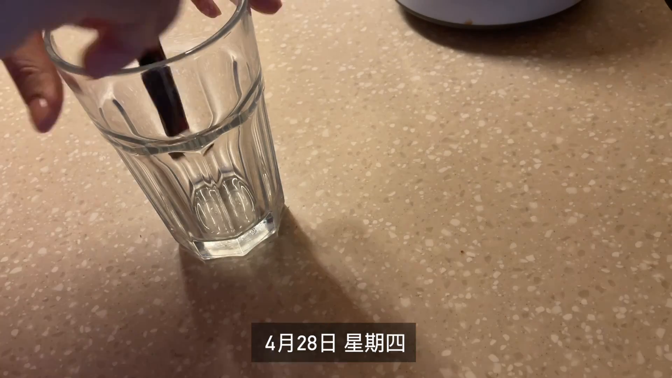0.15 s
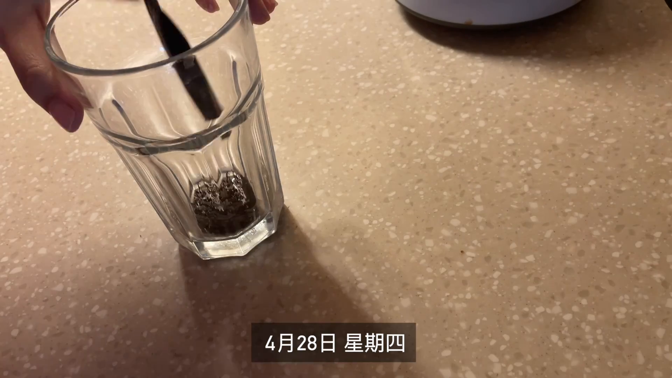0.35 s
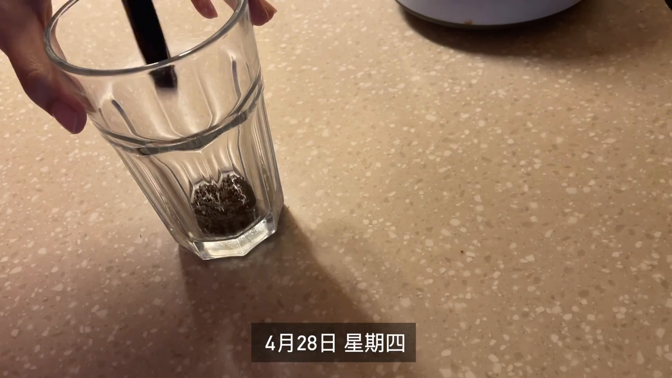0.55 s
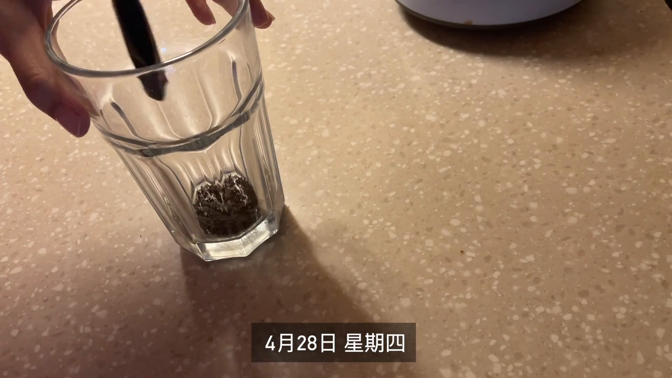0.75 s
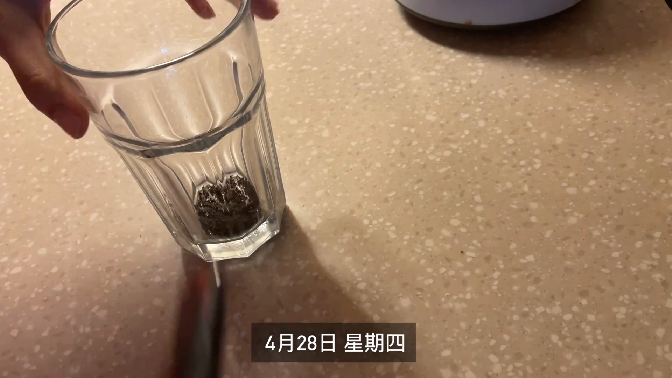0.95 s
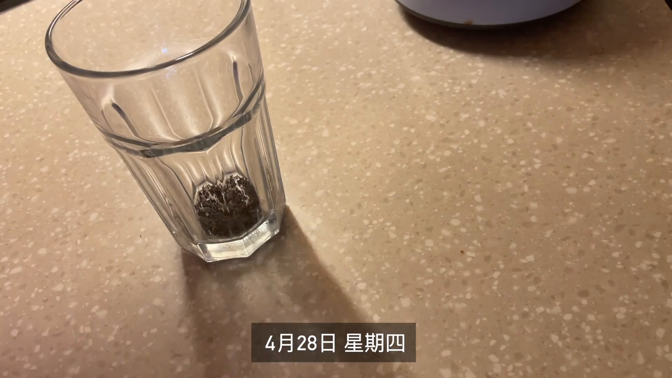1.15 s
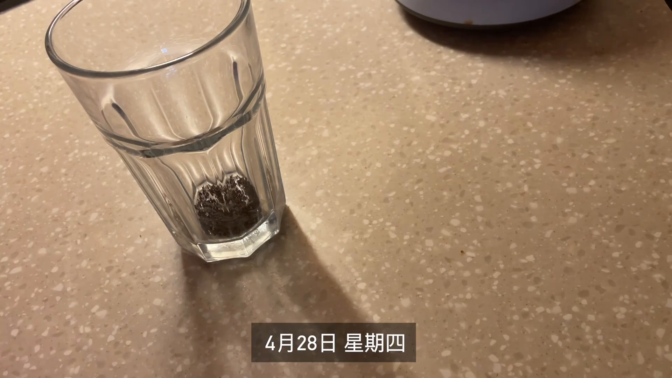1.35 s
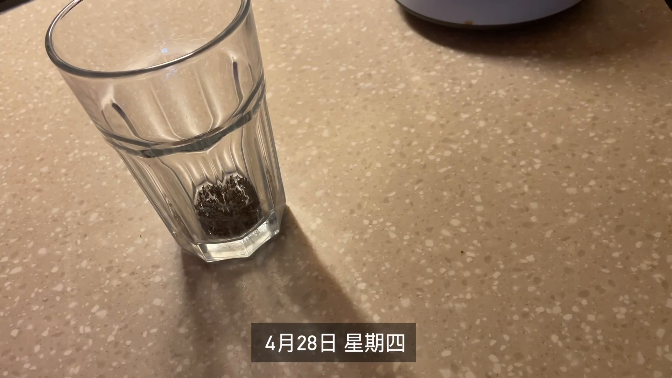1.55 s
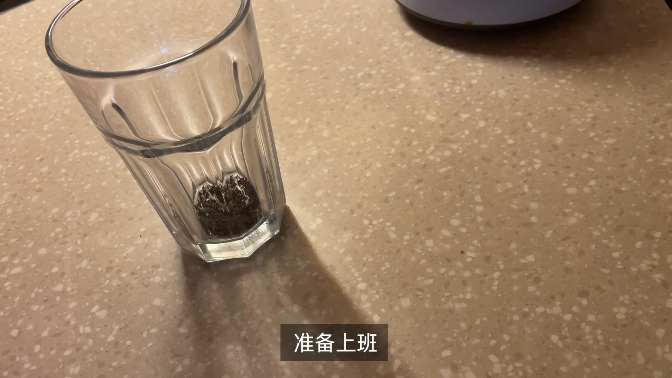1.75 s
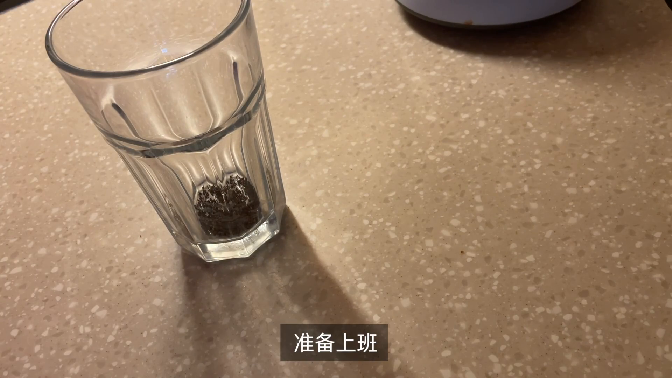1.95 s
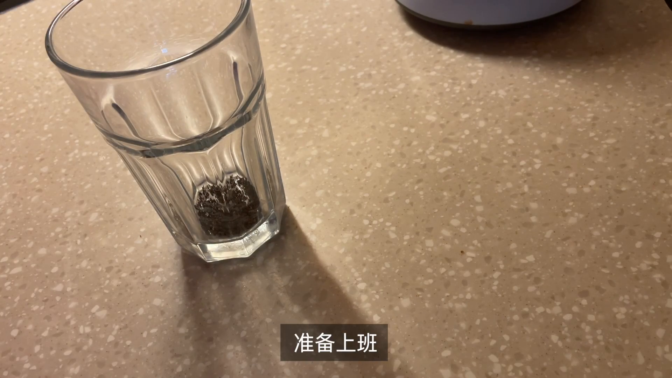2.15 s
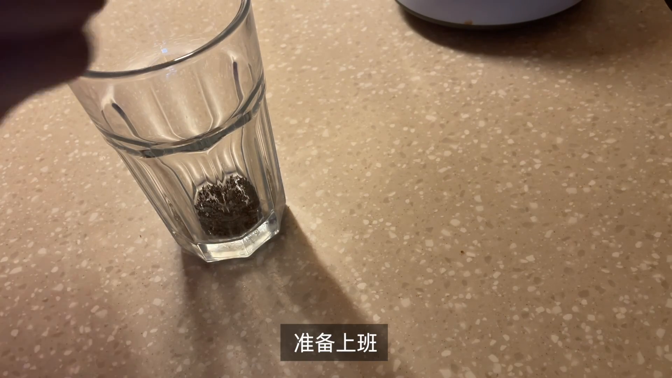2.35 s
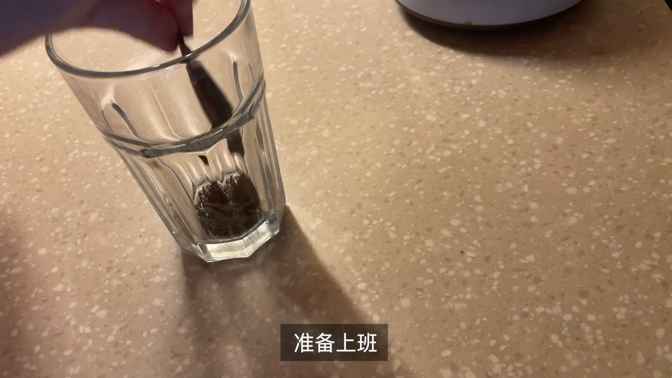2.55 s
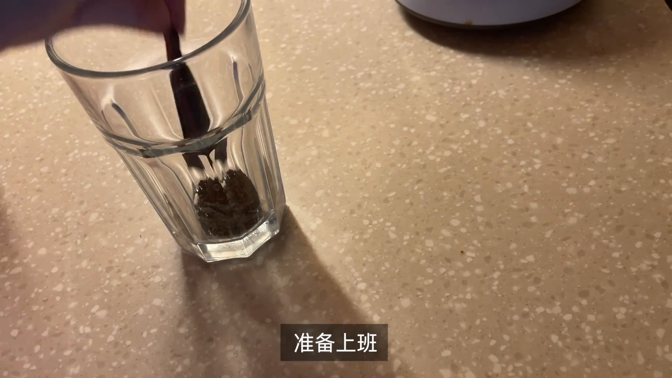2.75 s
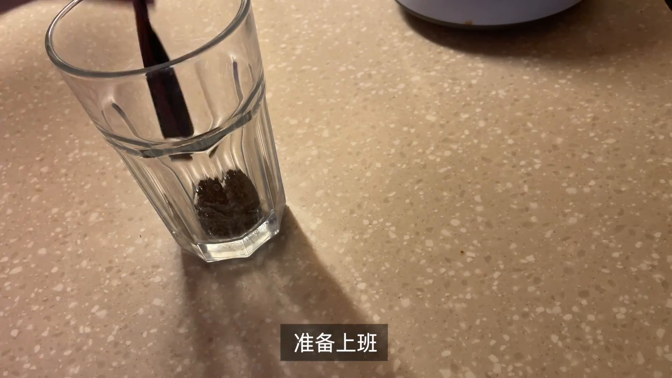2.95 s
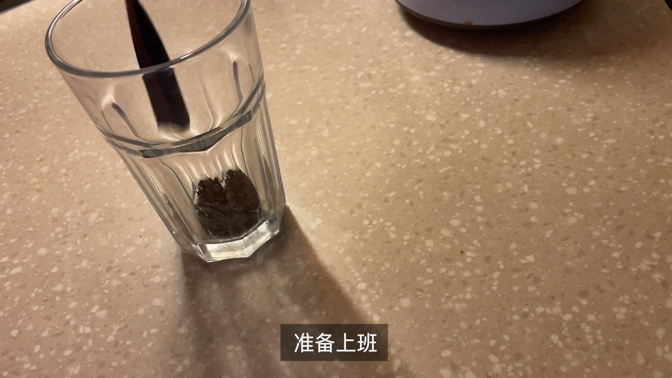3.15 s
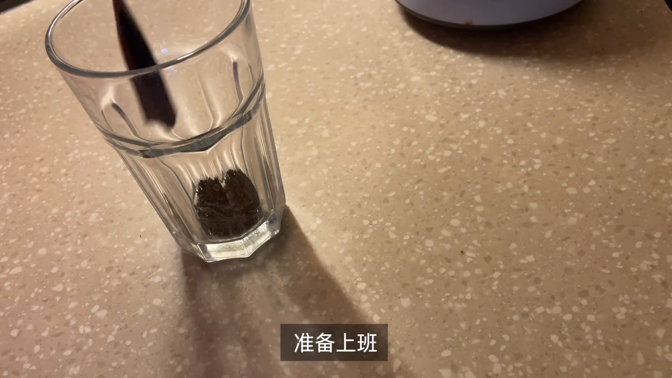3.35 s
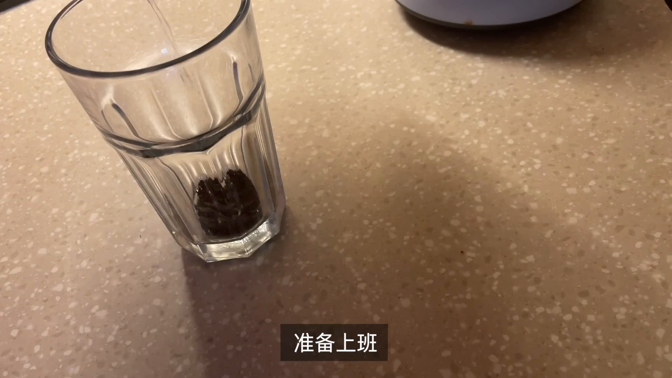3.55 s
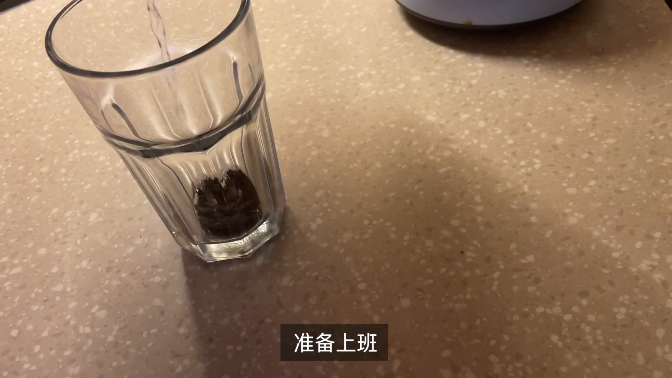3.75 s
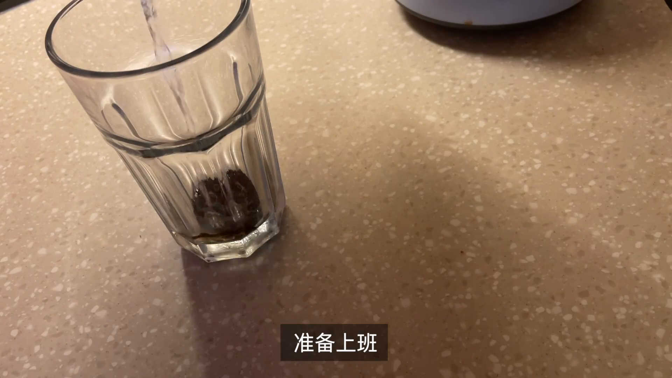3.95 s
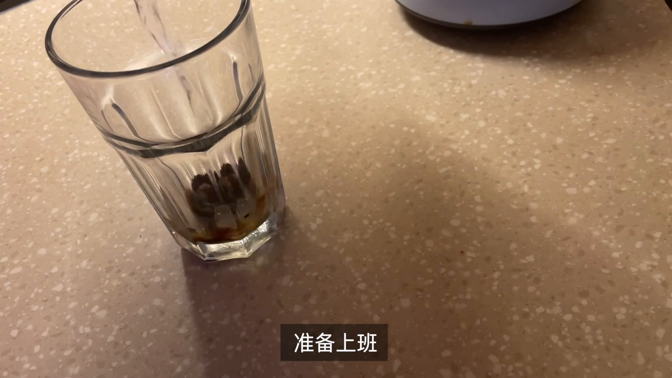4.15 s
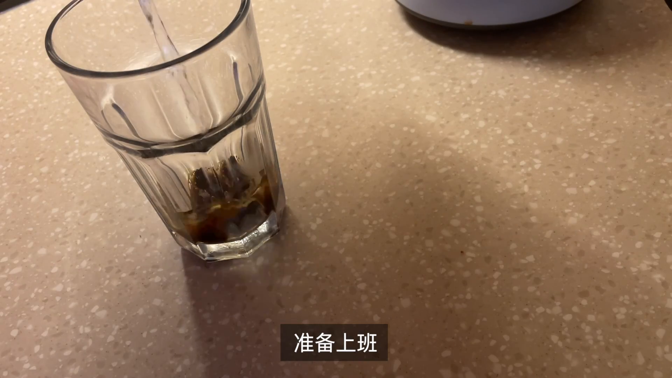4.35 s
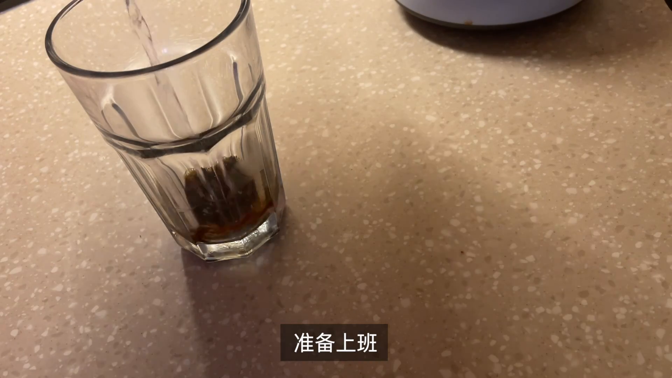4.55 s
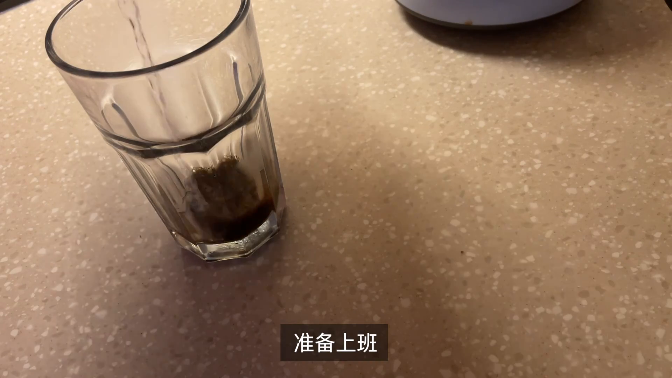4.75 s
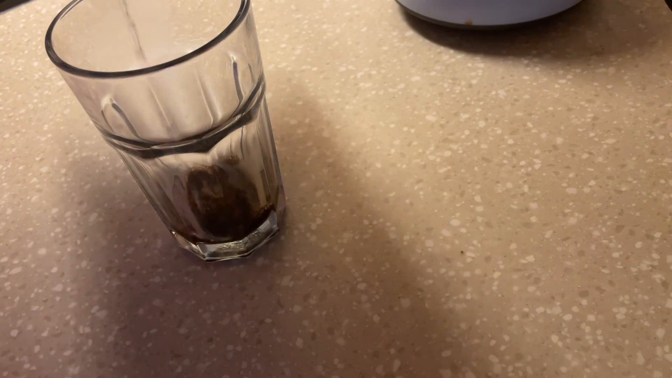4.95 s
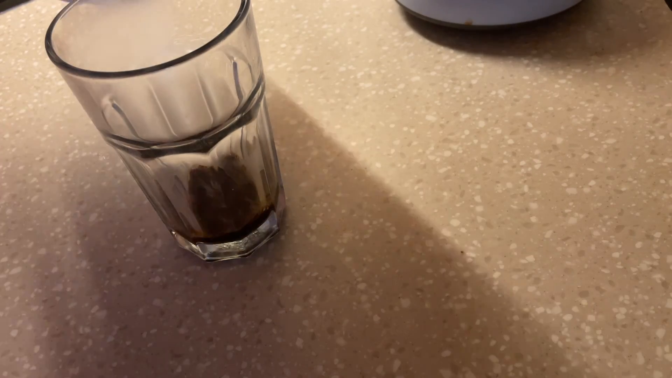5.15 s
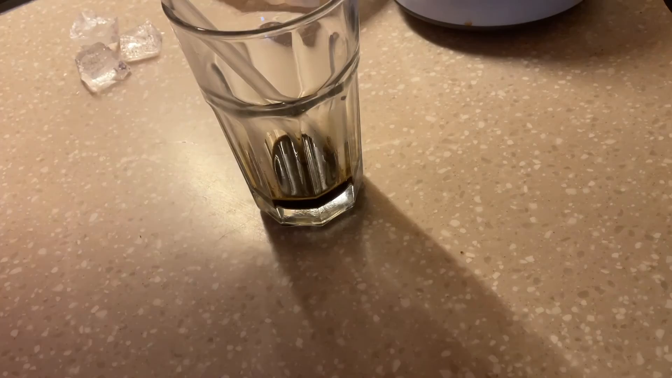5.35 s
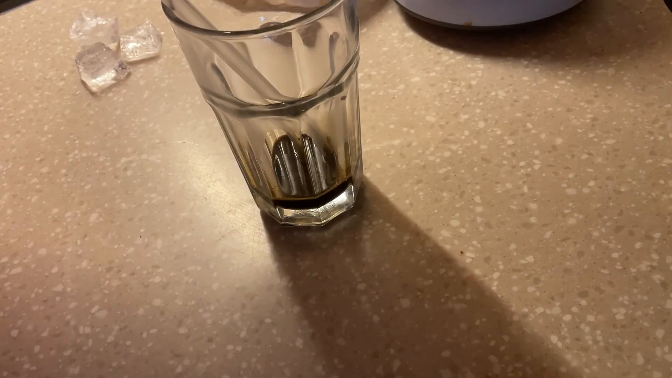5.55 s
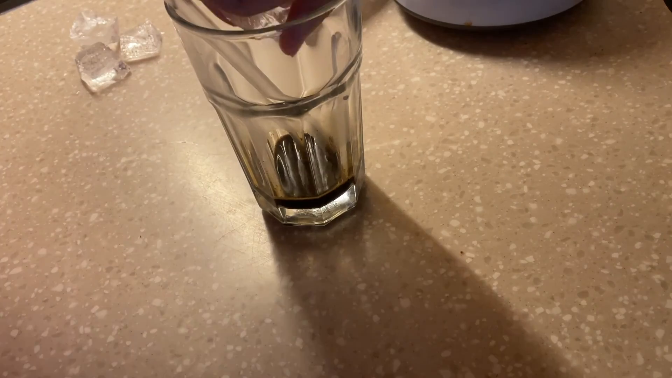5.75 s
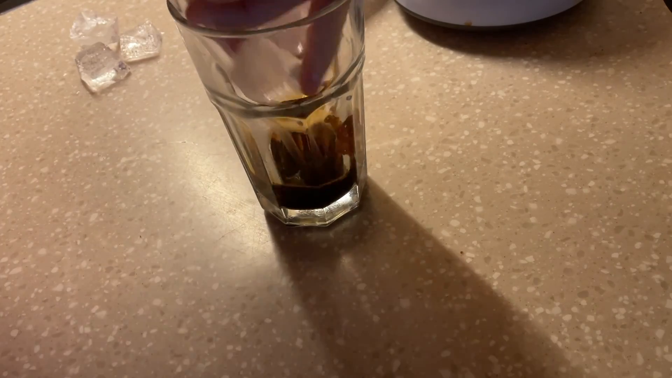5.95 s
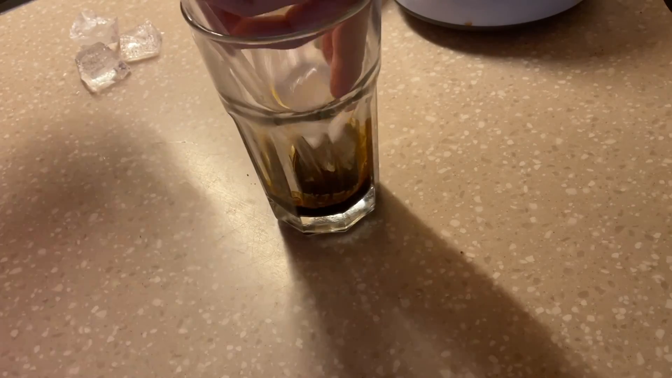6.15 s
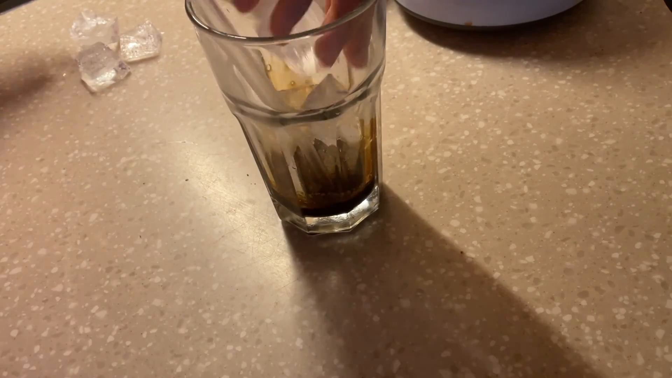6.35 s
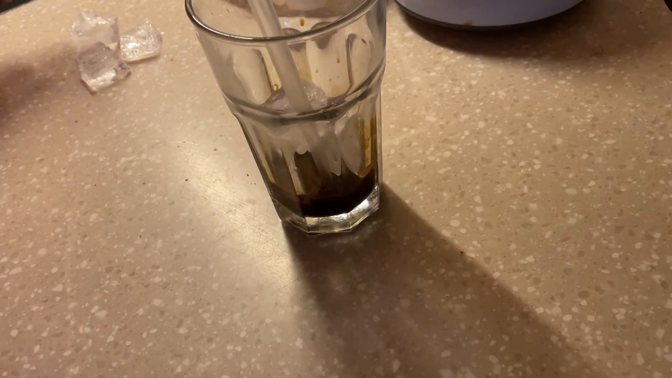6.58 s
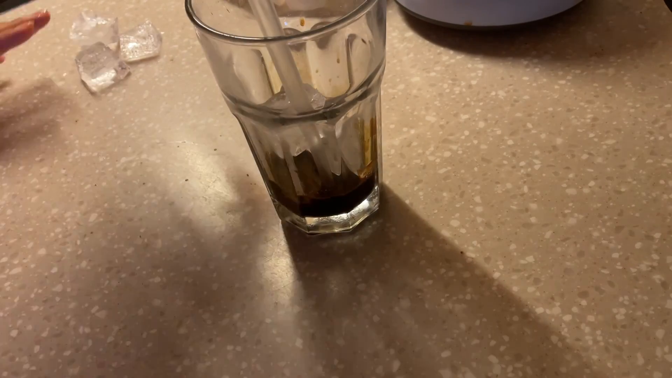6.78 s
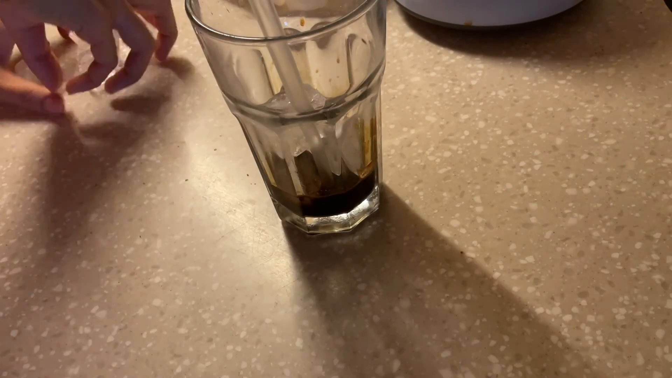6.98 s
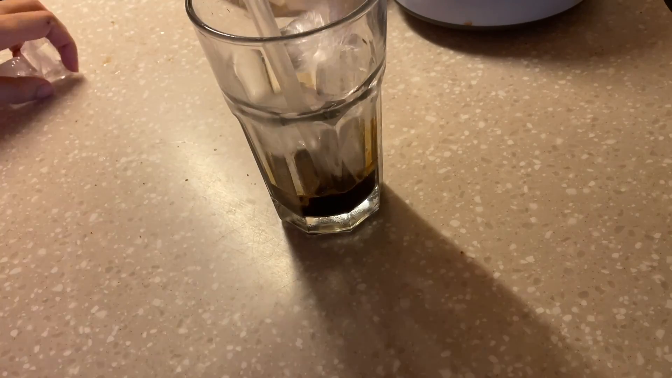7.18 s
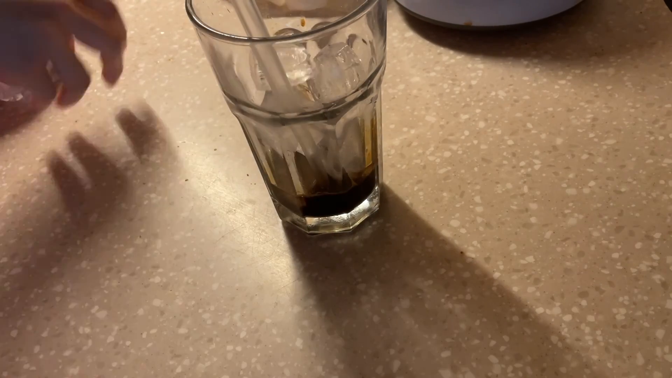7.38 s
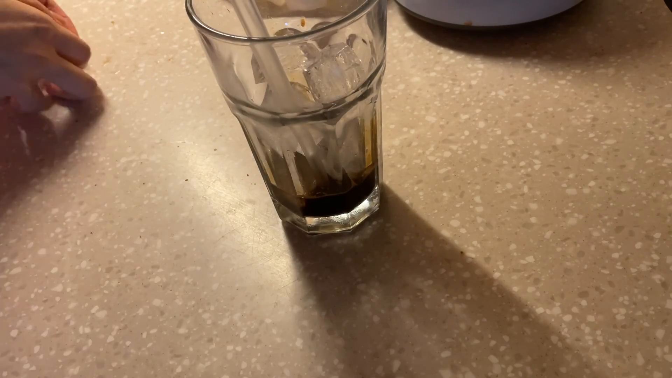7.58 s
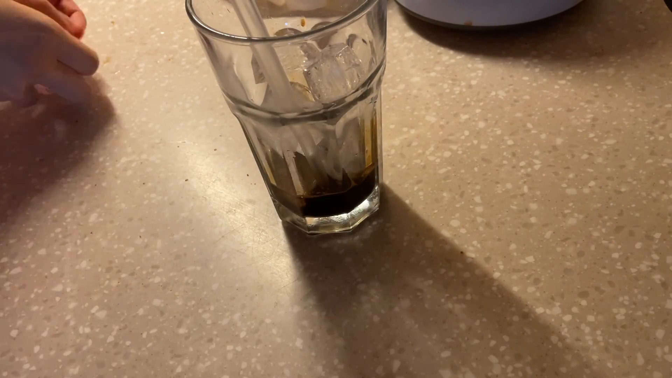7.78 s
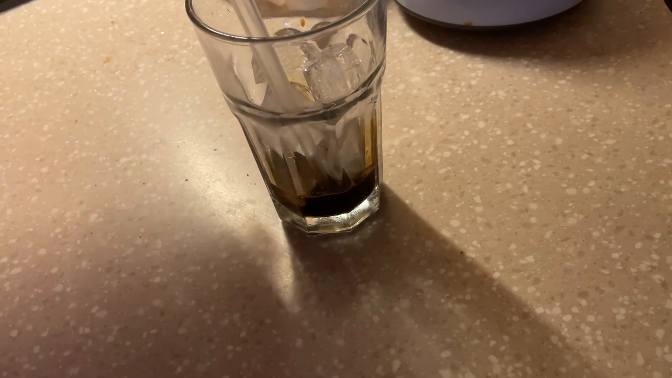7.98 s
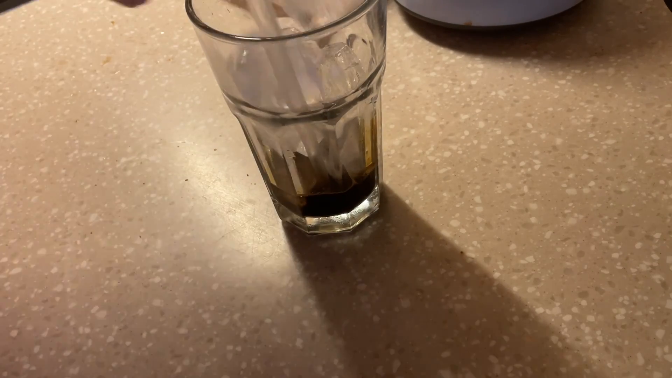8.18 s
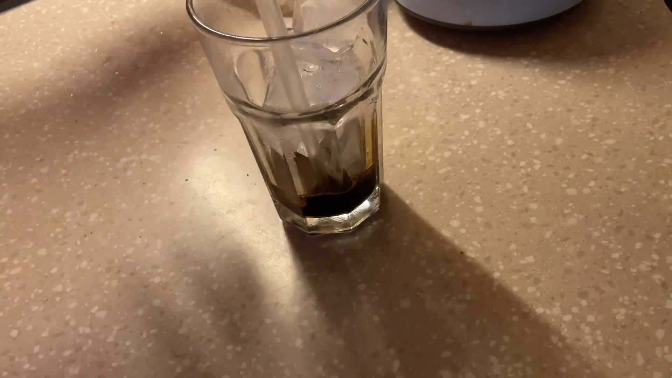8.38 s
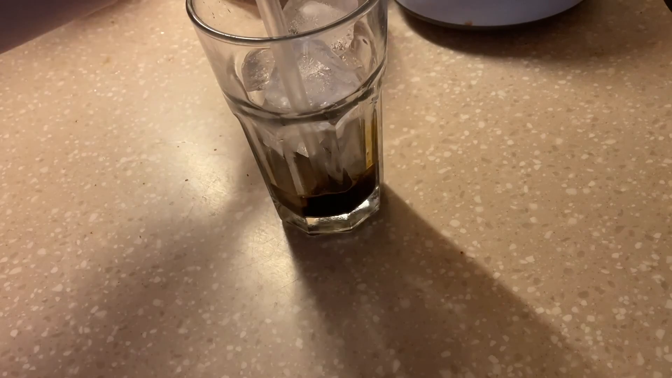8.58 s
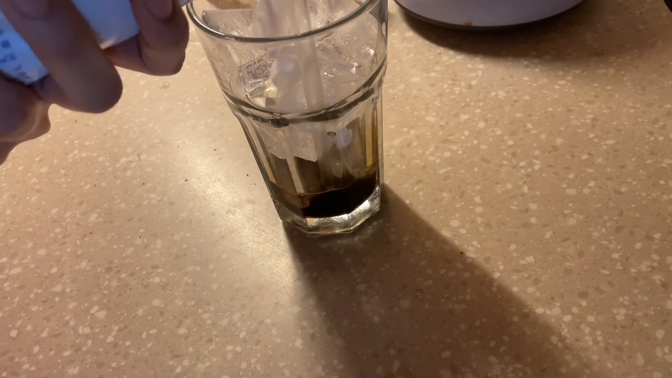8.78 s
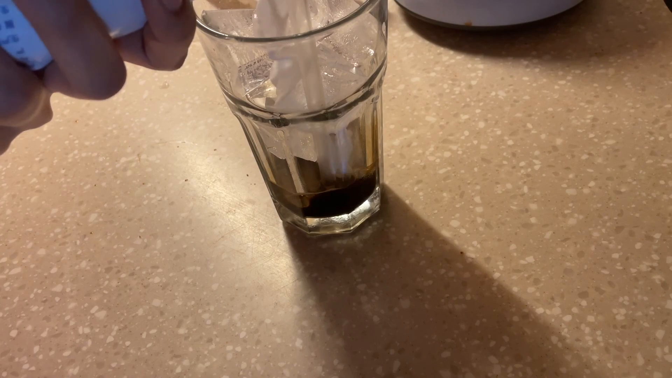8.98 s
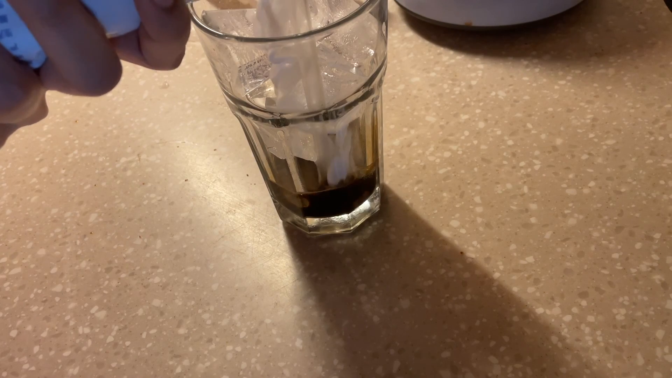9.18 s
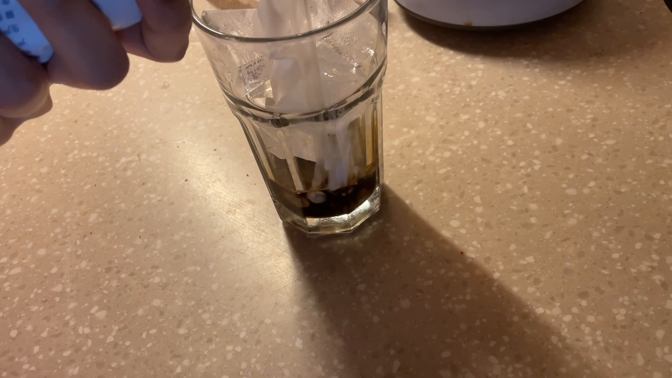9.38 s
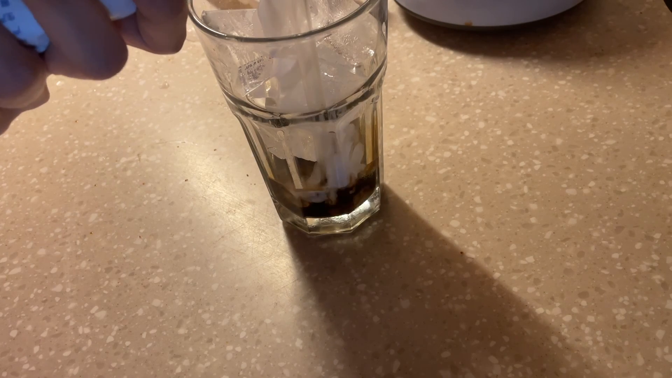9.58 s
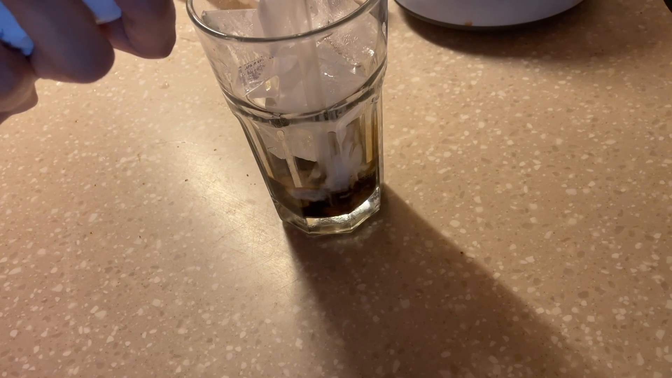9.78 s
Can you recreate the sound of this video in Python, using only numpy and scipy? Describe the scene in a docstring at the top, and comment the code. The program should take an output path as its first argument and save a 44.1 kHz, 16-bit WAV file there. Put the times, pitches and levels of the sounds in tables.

```python
"""Ice cubes drop one by one into a thick glass tumbler on a stone kitchen counter, heard close through two small
microphone ports. Each blow cracks, rings the wall's modes and thuds in the counter; the cubes rock and settle.
Before the ice, coffee powder runs in twice from a sachet as dry grains that stir the air in the glass.
A little water then trickles in as spray, drops and bubbles. Fingers and foil rustle, taps are short notes with
noise, and soft bumps are low wobbles. The room tone is filtered noise that rises and falls."""
import sys
import numpy as np
from scipy import signal
from scipy.fft import rfft, irfft, next_fast_len
from scipy.io import wavfile

SR = 44100
rng = np.random.default_rng(int(sys.argv[2]) if len(sys.argv) > 2 else 0)


def wrap_up_sound(samples):
    """Save the sound to the file named by the first command line argument, as 16-bit audio."""
    columns = np.atleast_2d(samples).T
    # keep every value between -1 and 1, then stretch to whole-number steps
    tamed = np.clip(columns, -1, 1)
    steps = np.round(tamed * 32767).astype(np.int16)
    wavfile.write(sys.argv[1], SR, steps)


N = 433062
T = np.arange(N) / SR   # s

# Table levels are relative: each layer applies its own trim, and the ports their balance.
# room tone around the counter: [t/s, rumble level/dB, wash level/dB]
ROOM = [(0.0, -52, -55), (.5, -56.5, -55.5), (1.2, -58, -58.5), (2.54, -62.5, -58.5), (3.3, -55.5, -58.5),
        (3.55, -58, -62), (4.3, -49, -59.5), (4.85, -57, -59.5), (5.47, -65.5, -67), (5.7, -51, -68.5),
        (6.8, -57.5, -69), (7.79, -65.5, -67), (8.1, -67, -60), (8.67, -58, -64), (8.83, -57, -55.5),
        (9.82, -56, -54.5)]
# spectra of the rumble and of the soft air: [f/Hz, level/dB per Hz]
RUMBLE = [(12, -43), (20, -6.5), (48, 4.5), (70, 6), (162, -10.5), (255, -19), (304, -8), (400, -34.5),
          (520, -37.5), (880, -120)]
AIR = [(88, -34), (150, -2), (871, -2.5), (1720, -8.5), (2180, -14.5), (6770, -44), (8560, -53.5),
       (9820, -24), (13400, -39.5), (16000, -40.5)]

# soft bumps of hand or arm on the counter: [t/s, level/dB, f/Hz, t60/s]
BUMPS = [(0.308, -39.5, 192, 0.19), (1.114, -35, 55, 0.18), (1.162, -28.5, 62, 0.13),
         (2.058, -45, 81.5, 0.16), (3.142, -28.5, 82, 0.23), (3.172, -29.5, 78, 0.17),
         (3.29, -49, 88, 0.98), (3.497, -34.5, 152, 0.091), (5.553, -38, 149, 0.079),
         (6.763, -34.5, 78.6, 0.11)]

# sachet and fingers moving, plus brief rough tails after some taps: [t/s, length/s, crisp rustle level/dB, dull
# rub level/dB]
HANDS = [(.0, 0.087, -57.5, -69), (1.051, 0.0033, -59, -38), (1.133, 0.018, -43, -38), (1.2, .01, -67, -51),
         (1.225, 0.14, -39, -45.5), (1.385, 0.068, -46, -54), (1.545, 0.26, -51, -68),
         (1.83, 0.34, -57.5, -65), (2.18, 0.011, -61, -65), (2.272, 0.0078, -50, -80),
         (2.3, 0.05, -71, -74), (3.116, 0.015, -52.5, -48), (3.29, 0.2, -63, -77), (4.81, 0.14, -74.5, -92),
         (5.01, 0.13, -65.5, -65), (5.15, 0.72, -78, -93), (5.56, 0.31, -84, -65.5),
         (6.775, 0.2, -66.5, -74.5), (6.965, 0.11, -70, -51.5), (7.075, 0.019, -70, -37),
         (7.685, 0.033, -84.5, -52), (7.8, 0.12, -77.5, -79.5), (8.035, .02, -76, -68),
         (8.585, 0.13, -61.5, -60), (8.81, 0.24, -84.5, -65.5), (9.13, 0.059, -74, -60),
         (9.428, 0.072, -80.5, -61), (9.715, 0.031, -80, -54.5)]
# spectra of foil rustle and finger rub: [f/Hz, level/dB per Hz]
RUSTLE = [(1200, -33.5), (2200, -9), (4000, -6.5), (6500, -8), (9000, -5.5), (11000, -3.5), (13500, -4),
          (16000, -35.5)]
RUB = [(180, -36), (300, -38.5), (524, -5), (838, 5), (1530, 3.5), (2870, -0.5), (3580, -18), (7030, -37),
       (8760, -28), (10000, -17), (13000, -54), (22000, -120)]
HAND_START_S, HAND_STOP_S, HAND_SAG_DB_PER_S = 0.0052, 0.035, 28.5
HAND_RISE_SHARE = 0.22   # share of its length that a stroke takes to come up

# shakes of powder: [t/s, length/s, patter level/dB]
POWDER = [(.195, 0.049, -40), (.325, 0.036, -53), (.435, 0.016, -60), (.505, 0.024, -57.5),
          (2.485, 0.082, -43), (2.63, 0.097, -55)]
# spectrum of grains on the bottom of the glass: [f/Hz, level/dB per Hz]
PATTER = [(600, -72), (1200, -42), (2400, -5), (3100, -2), (4500, -2.5), (7000, -2.5), (9500, 3.5),
          (12500, -0.5), (16000, -7.5)]
# air in the empty glass, lowest mode, then higher modes: [f/Hz, width/Hz, level/dB]
DRY_COLUMN = [(668, 23, 0)]
OVERTONES = [(1770, 48, 4.5), (3040, 210, 5), (3680, 150, -13)]
POWDER_AIR_DB, POWDER_SWELL_S, POWDER_STOP_S = -3, 0.094, 0.017
POWDER_AIR_LAG_S = .03   # the air sings fullest as the stream ends

# trickle of water: [t/s, spray level/dB, splashing in the glass level/dB, gurgle level/dB]
TRICKLE = [(3.55, -84, -92, -85), (3.56, -63, -86, -77), (3.65, -71.5, -76, -71), (3.818, -56.5, -73, -76),
           (3.886, -52, -61.5, -64), (4.066, -57, -52.5, -67), (4.12, -67.5, -67, -79),
           (4.132, -55, -41.5, -63), (4.2, -53, -58.5, -61), (4.268, -61, -70, -54.5),
           (4.344, -63, -53, -75), (4.49, -56, -52.5, -51.5), (4.652, -58, -56, -70),
           (4.696, -46, -49.5, -53), (4.768, -53, -54, -44.5), (4.84, -75, -82, -73)]
# spectrum of the spray: [f/Hz, level/dB per Hz]
SPRAY = [(1200, -29), (2000, -34), (2700, -27), (3500, -14), (5000, -13), (8000, -3), (11000, 1),
         (13500, -9), (16000, -11)]
# air stirred by splashes, then lowest air mode with big bubbles: [f/Hz, width/Hz, level/dB]
WET_COLUMN = [(1690, 110, -2), (2210, 170, -9.5), (3320, 110, -8.5), (3900, 110, -17), (4850, 440, -9)]
GURGLE = [(750, 21, -5.5), (845, 200, -9), (1060, 340, -30)]
# single drops: [t/s, level/dB, bubble starting f/Hz]
DROPS = [(3.717, -43, 670), (3.757, -58, 730), (3.78, -49, 774), (3.799, -35, 690), (3.831, -43, 496),
         (3.844, -55, 747), (3.869, -37, 723), (3.904, -32.5, 680), (3.925, -32, 1760), (3.954, -39, 1820),
         (3.971, -34, 695), (3.995, -27, 1590), (4.015, -27, 1850), (4.063, -29, 1700), (4.102, -44, 1820),
         (4.135, -14.5, 1880), (4.171, -24, 1830), (4.249, -23.5, 715), (4.313, -32.5, 3430),
         (4.333, -21, 3450), (4.376, -46, 1710), (4.407, -25.5, 1086), (4.461, -29.5, 5030),
         (4.475, -23.5, 1760), (4.518, -20, 1080), (4.562, -32, 1720), (4.612, -50, 2380),
         (4.638, -34, 1838), (4.68, -20.5, 4760), (4.705, -19.5, 1070)]

# taps and snaps of sachet, spoon, fingers and settling ice:
# [t/s, note level/dB, note f/Hz, snap level/dB, thud level/dB, note t60/s]
TAPS = [(0.306, -63, 465, -57, -37.5, 0.045), (0.746, -48, 905, -67, -50, 0.062),
        (0.917, -53, 859, -86, -59, 0.064), (1.048, -18, 757, -38, -42, 0.074),
        (1.132, -25, 2160, -32, -58, 0.024), (1.154, -18.5, 2390, -45.5, -47, 0.04),
        (1.222, -19.5, 1920, -23.5, -49.5, 0.034), (1.265, -20.5, 2350, -40, -53.5, 0.041),
        (1.285, -31, 1060, -28.5, -70, 0.045), (1.3, -26.5, 735, -34, -69, 0.059),
        (1.322, -26, 2340, -40, -67, 0.037), (1.377, -36.5, 484, -48, -58, 0.038),
        (1.4, -38, 2280, -50, -57, 0.049), (1.421, -30, 1060, -50, -53, 0.032),
        (1.443, -32, 2260, -36, -55, 0.03), (1.491, -55, 3130, -30, -70, 0.037),
        (1.536, -67, 3170, -40, -58, 0.045), (1.586, -78, 3130, -51, -59, 0.045),
        (1.626, -48, 2380, -44, -59, 0.057), (1.728, -49, 2540, -42, -72, 0.065),
        (1.912, -51, 1280, -58, -64, 0.045), (1.946, -39, 2600, -51, -67, 0.03),
        (2.006, -39.5, 910, -59, -64, 0.054), (2.075, -44.5, 864, -59, -58, 0.096),
        (2.177, -37, 2260, -41, -75, 0.038), (2.271, -46, 2170, -46, -61, 0.058),
        (2.859, -46.5, 705, -75, -58, 0.045), (3.112, -21, 810, -59.5, -32.5, 0.035),
        (4.999, -45, 1190, -48.5, -48, 0.08), (5.014, -23, 877, -75, -54, 0.065),
        (5.068, -42, 750, -60, -60, 0.05), (5.093, -43, 945, -59, -55, 0.041),
        (5.288, -63, 830, -77, -63, 0.041), (5.417, -56, 894, -77, -77, 0.047),
        (5.656, -33, 554, -57.5, -48, 0.041), (5.66, -36.5, 2360, -43.5, -35, 0.081),
        (5.706, -42, 570, -57, -41, 0.051), (5.742, -31, 620, -48.5, -47.5, 0.057),
        (6.953, -40, 560, -60, -48.5, 0.053), (6.971, -14, 555, -77, -39, 0.029),
        (7.004, -30, 528, -56.5, -38.5, 0.045), (7.023, -36, 528, -70.5, -32, 0.045),
        (7.061, -30.5, 550, -67.5, -36, 0.045), (7.077, -24.5, 610, -55, -55.5, 0.045),
        (7.094, -22.5, 510, -54, -42, 0.045), (7.12, -23, 570, -48.5, -47, 0.031),
        (7.678, -30.5, 540, -64, -55, 0.058), (7.802, -36, 1800, -57, -73.5, 0.036),
        (8.582, -43.5, 1680, -43, -59, 0.04), (8.611, -30, 578, -76, -43, 0.037),
        (8.648, -37, 641, -76, -41, 0.038), (8.903, -37, 1700, -107, -52.5, 0.04),
        (8.961, -45.5, 1074, -93.5, -60.5, 0.045), (9.103, -52, 947, -71, -54, 0.05),
        (9.158, -56, 1085, -78, -52, 0.04), (9.425, -29.5, 1444, -54.5, -51, 0.029),
        (9.444, -36.5, 1410, -68.5, -54.5, 0.038), (9.473, -53, 1320, -47, -63, 0.045),
        (9.546, -50.5, 1075, -68, -59, 0.04), (9.589, -47.5, 2830, -98.5, -55, 0.049),
        (9.718, -34.5, 2070, -61, -52, 0.037), (9.742, -48, 1245, -61, -59, 0.045),
        (9.794, -45.5, 770, -61, -66.5, 0.039), (3.117, -29, 1146, -79, -59, .06),
        (5.882, -15, 696, -69, -40, 0.15), (6.11, -25, 1780, -81.5, -58.5, 0.05),
        (7.365, -30, 1730, -80, -57, .04), (8.2, -15, 930, -70, -50, 0.17)]

# ice striking the wall: [t/s, crack level/dB, five ring families low to high level/dB, share of full ring t60]
ICE = [(5.812, -33, -21.5, -28, -28, -35, -33.5, 0.86), (5.8167, -23, -28, -23, -20, -35, -33, 0.33),
       (5.8224, -27, -8.5, -38, -16, -31.5, -23.5, 0.9), (5.8534, -35, -36, -32, -22, -24, -26, 1),
       (5.8814, -21.5, -34, -36, -47, -29, -36, 0.69), (5.8981, -32, -33, -22, -26, -35, -29, 1),
       (5.9204, -33, -22, -44, -22.5, -34, -32, 1), (5.9504, -28, -28, -46, -18.5, -31, -32.5, 0.56),
       (5.9673, -31, -34, -54, -36, -27.5, -33.5, 0.92), (6.0158, -35, -38.5, -48, -38, -49, -51, 0.5),
       (6.0314, -32, -39.5, -62, -39, -41, -55, 1), (6.109, -38.5, -42, -53, -46, -47, -63, 0.4),
       (6.1464, -20.5, -25, -17, -27, -31, -29, 0.2), (6.1519, -19, -14.5, -29, -15.5, -31, -30.5, 0.62),
       (6.1634, -20.5, -22, -27, -16.5, -28.5, -28, 0.63),
       (6.1755, -30.5, -16, -35, -10.5, -23.5, -18, 0.69), (6.1984, -34, -29, -41, -39, -37, -36, 0.76),
       (6.2181, -27, -39, -34, -26, -33, -31, 0.71), (6.262, -31, -38, -50, -38, -32.5, -37, 1),
       (6.3835, -21.5, -21.5, -19, -23, -29.5, -20, 0.48), (6.4044, -31, -19.5, -23, -35, -28.5, -22, 0.55),
       (6.4254, -33, -20, -43, -47, -21.5, -38, 1), (6.4484, -25.5, -27.5, -12.5, -35, -21, -16.5, 0.26),
       (6.4562, -22, -13, -21, -10, -25.5, -27, 0.72), (6.4791, -32.5, -20, -18.5, -21, -33, -32, 0.6),
       (6.5397, -40.5, -25.5, -19, -51, -52.5, -40, 0.41), (6.5942, -35, -38, -47, -50, -43.5, -49, 0.83),
       (7.1549, -21, -4, -23, -13.5, -36, -28.5, 0.36), (7.188, -15.5, -24.5, -39, -25, -32.5, -27.5, 0.35),
       (7.208, -33.5, -24, -39, -50, -37, -52, 0.74), (7.2314, -25.5, -26, -22, -40, -32, -45, 0.41),
       (7.2626, -32, -31, -46, -33, -47.5, -38.5, 1), (7.2871, -39.5, -33, -43, -37, -39, -56, 0.46),
       (7.4134, -37, -58, -61, -67, -70, -62, 0.42), (7.4829, -35, -45, -42, -53, -70, -77, 0.42),
       (7.4991, -32.5, -22.5, -33, -34, -46, -46.5, 0.49), (7.5183, -52, -33.5, -45, -51.5, -55, -62, 0.34),
       (8.0779, -48.5, -55.5, -41, -43.5, -48.5, -59.5, 0.43),
       (8.107, -45, -52.5, -55, -43.5, -51.5, -46.5, 0.58), (8.1596, -27, -24, -29, -32, -35, -29, 0.47),
       (8.192, -17.5, -33, -25, -32, -32, -22, 0.35), (8.1978, -17, -15, -29, -36, -23, -14, 0.28),
       (8.2128, -16.5, -13.5, -29, -31, -31, -19, 0.23), (8.2242, -27.5, -34.5, -47, -34, -28, -25, 0.6),
       (8.236, -30, -20.5, -49, -37, -23, -19.5, 0.5), (8.288, -59, -47.5, -72, -40, -52.5, -44, 0.64),
       (8.3505, -32, -44, -37, -45, -52, -67, 0.6), (8.4021, -32, -25.5, -55, -30.5, -64, -48, 0.2),
       (8.4657, -39.5, -51, -51, -53, -63, -64, 0.39), (8.4803, -36, -48, -57, -56, -58, -57, 0.34),
       (8.5166, -43.5, -52, -52, -70, -66, -64, 0.44)]
# free modes of the glass wall, in close pairs at first: [f/Hz, level/dB, t60/s]
GLASS = [(2358, 0, .16), (2373, -6, .16), (4823, 0, .2), (4846, -7, .15), (3145, 0, .09), (3260, -8, .05),
         (5790, -2, .1), (5905, -9, .08), (6156, -2, .1), (8226, 3, .12), (9491, -4, .1), (10280, -5, .07),
         (11500, -9, .07), (12570, -5, .1), (13180, -6, .08), (14400, -6, .07), (15500, -9, .07)]
# borders between the five ring families: [f/Hz]
FAMILY_FROM_HZ = [2800, 4000, 5400, 7000]
# counter and heavy base of the glass: [f/Hz, level/dB, t60/s]
COUNTER = [(71, -6.5, 0.17), (109.5, 4, 0.089), (225.3, 1.5, 0.14), (317.6, 4.5, 0.1), (486.3, 4.5, 0.058),
           (604, -4, 0.1), (719.3, -2, 0.1), (921, -9.5, 0.26)]
# spectrum of ice cracking on glass: [f/Hz, level/dB per Hz]
CRACK = [(530, -32.5), (900, -2), (1090, -8), (1990, -4), (2330, -10), (2660, -1.5), (4860, -14),
         (7680, -27), (10800, -26), (16000, -44.5)]
# air column before and after ice shortens it: [f/Hz, width/Hz, level/dB]
AIR_EMPTY = [(700, 15, 0)]
AIR_FILLED = [(961, 9.2, 0)]
FILLED_AT_S = 7.0
CUBE_LOW_HZ, CUBE_HIGH_HZ, CUBE_T60_S = 1523, 15460, 0.092   # a cube's own short, dull modes
CONTACT_S, ROCK_SWELL_S = 0.00087, 0.021   # time constants of a blow's onset and of the unrest

# phase by which the left port leads: [f/Hz, phase/rad]
PORT_PHASE = [(20, 0), (300, .3), (700, 1.3), (2600, 1.2), (4500, .4), (5200, .2), (5900, -1), (7000, -1.3),
              (7700, -2.7), (8700, -3.14), (10000, -3.8), (12000, -5.3), (13500, -6.2), (16000, -6.4)]
# left port minus right port: [f/Hz, level/dB]
PORT_BALANCE = [(60, -4.5), (130, -2), (290, -0.5), (640, -2), (1410, 3.5), (3100, 5), (6820, 2.5),
                (15000, 1)]
# kitchen reflections relative to the direct sound: [f/Hz, level/dB]
REFLECTED = [(60, -16), (300, -10), (1000, -4), (2400, -10), (4000, -5), (7000, -7), (9000, -14),
             (16000, -18)]
KITCHEN_T60_S, CUTOFF_HZ = 0.2, 16500


def from_db(db):
    """dB to gain."""
    return 10 ** (np.asarray(db) / 20)


def rms_one(x):
    """Scale to rms 1."""
    return x / np.sqrt(np.mean(x ** 2) + 1e-20)


def fade(t, t60):
    """Falls 60 dB in t60."""
    return np.exp(-np.log(1000) * t / t60)


def add(out, s, sound):
    """Mix a sound in at time s."""
    i = round(s * SR)
    out[i:i + len(sound)] += sound[:N - i]


def noise_track():
    """White noise for the whole scene."""
    return rng.standard_normal(N)


def gains(tables):
    """Level columns of several spans as gains in time, silent between the spans."""
    out = 0
    for rows in tables:
        s, *columns = np.transpose(rows)
        out = out + from_db([np.interp(T, s, c, left=-200, right=-200) for c in columns])
    return out


def strokes(rows, start_s, stop_s, sag_db_per_s, rise_share):
    """Each stroke swells by 30 dB, sags while it holds, and drops away by 30 dB."""
    spans = []
    for s, length, *levels in rows:
        hold, db = max(length, .001), np.array(levels)
        end_db = db - sag_db_per_s * hold
        spans.append([(s - start_s, *(db - 30)), (s + rise_share * hold, *db),
                      (s + hold, *end_db), (s + hold + stop_s, *(end_db - 30))])
    return gains(spans)


def flutter(rate, depth_db):
    """A gain that wavers at random between rate knots a second (200 at most)."""
    knots = rng.standard_normal(round(N / SR * 200) + 2)
    return from_db(depth_db * np.interp(T * min(rate, 200), np.arange(len(knots)), knots))


def at_hz(points, hz):
    """Read a spectrum on a log-frequency axis."""
    table_hz, values = np.array(points).T
    return np.interp(np.log(hz + 1), np.log(table_hz + 1), values)


def colour(x, spectrum):
    """Causal (minimum-phase) filter with the given spectrum, by folding its cepstrum; rms 1."""
    size = 4096
    magnitude = from_db(at_hz(spectrum, np.fft.rfftfreq(size, 1 / SR)))
    cepstrum = irfft(np.log(magnitude))
    cepstrum[1:size // 2] *= 2
    cepstrum[size // 2 + 1:] = 0
    impulse = irfft(np.exp(rfft(cepstrum)))
    return rms_one(signal.oaconvolve(x, impulse)[:len(x)])


def band(x, low_hz, high_hz):
    """Band-pass; rms 1."""
    edges = [low_hz, min(high_hz, .45 * SR)]
    return rms_one(signal.sosfilt(signal.butter(2, edges, "band", fs=SR, output="sos"), x))


def grains(per_s, spread_db):
    """Random clicks of either sign with a long tail of strong ones."""
    sizes = from_db(spread_db * np.minimum(rng.exponential(1, N), 5)) * rng.choice([-1, 1], N)
    return sizes * (rng.random(N) < per_s / SR) + 1e-18


def ring(x, hz, t60):
    """Two-pole resonator: a unit click sets a decaying sine of height 1 ringing."""
    r, w = from_db(-60 / (t60 * SR)), 2 * np.pi * hz / SR
    return signal.lfilter([0, np.sin(w)], [1, -2 * r * np.cos(w), r * r], x)


def column(per_s, spread_db, peaks):
    """The air in the glass sings at its resonances, each stirred by its own random clicks; rms 1."""
    out = 0
    for hz, width, db in peaks:
        t60 = np.log(1000) / np.pi / width   # a narrower peak rings longer
        out = out + from_db(db) * rms_one(ring(grains(per_s, spread_db), hz, t60))
    return rms_one(out)


def counter(pushes):
    """Pushes ring the modes of counter and glass base, with alternating sign."""
    return sum(from_db(db) * ring(pushes + 1e-18, hz, t60) * (-1) ** k
               for k, (hz, db, t60) in enumerate(COUNTER))


def rocking(t60, axis):
    """Unrest of the cubes: every blow swells it by the power in one of its columns, then it dies away."""
    power = np.zeros(N)
    for blow in ICE:
        add(power, blow[0], from_db([2 * blow[axis]]))
    swell, fall = np.exp(-1 / (ROCK_SWELL_S * SR)), from_db(-120 / (t60 * SR))   # per sample, in power
    poles = np.convolve([1, -swell], [1, -fall])
    return np.sqrt(signal.lfilter([1 - swell], poles, power + 1e-18).clip(0))


def room_tone():
    """Low rumble, nearly alike at both ports, and soft air that differs between them."""
    rumble, air = gains([ROOM])
    air = air + from_db(-15.5) * rocking(0.25, axis=1)   # the clatter fills the room
    shared, opposed = colour(noise_track(), RUMBLE), colour(noise_track(), RUMBLE)
    low = shared + .2 * opposed * [[1], [-1]]
    soft = np.array([colour(noise_track(), AIR) for side in range(2)])
    return rumble * low + from_db(-5.5) * air * soft


def bumps():
    """Low, uneven wobbles of sine and band noise that swell in and die."""
    out, t = np.zeros(N), T[:SR // 2]
    swell = 1 - np.exp(-t / 0.0082)
    for s, level_db, hz, t60 in BUMPS:
        rough = band(rng.standard_normal(len(t)), 0.14 * hz, 2.6 * hz)
        wobble = np.sin(2 * np.pi * hz * t) + 0.37 * rough
        add(out, s, from_db(level_db) * wobble * swell * fade(t, t60))
    return out


def hands():
    """Foil crackles finely in uneven swells, fingers rub and drag."""
    crisp, dull = strokes(HANDS, HAND_START_S, HAND_STOP_S, HAND_SAG_DB_PER_S, HAND_RISE_SHARE)
    foil = flutter(35., depth_db=7.5) * colour(grains(15000.0, spread_db=4.0), RUSTLE)
    fingers = flutter(60., depth_db=8.0) * colour(grains(1800.0, spread_db=4.0), RUB)
    return crisp * foil + dull * fingers


def powder():
    """Dense dry grains hit the bottom and stir the air column."""
    patter, = strokes(POWDER, POWDER_SWELL_S, POWDER_STOP_S, sag_db_per_s=30., rise_share=0)
    bright = colour(grains(9000., spread_db=3.0), PATTER) + from_db(-6.5) * column(3000., 3.7, OVERTONES)
    late_patter = np.interp(T - POWDER_AIR_LAG_S, T, patter)
    singing = flutter(29.65, depth_db=2.0) * column(2400.0, 0.47, DRY_COLUMN)
    return patter * bright + from_db(POWDER_AIR_DB) * late_patter * singing


def bubbles(count, start_s, end_s):
    """Small bubbles of many sizes, each a short note sliding upward; rms 1 over the span."""
    out, t = np.zeros(N), T[:SR // 20]
    for when, size, power in rng.random((count, 3)):
        hz = 800 * 2.8 ** size
        note = np.sin(2 * np.pi * hz * (t + 3.1 * t ** 2)) * fade(t, 22. / hz)
        add(out, start_s + (end_s - start_s) * when, from_db(15.0 * power) * note)
    return out / np.sqrt(np.mean(out[round(start_s * SR):round(end_s * SR)] ** 2))


def water():
    """Spray and small splashes stir the air column; drops pop and leave a bubble rising in pitch."""
    spray, air, gurgle = gains([TRICKLE])
    out = spray * colour(grains(5100.0, spread_db=7.0), SPRAY)
    out += air * column(600., 6.5, WET_COLUMN) + gurgle * column(590.0, 2.0, GURGLE)
    out += from_db(-29.0) * air * bubbles(count=260, start_s=TRICKLE[0][0], end_s=TRICKLE[-1][0])
    t = T[:SR // 10]
    for s, level_db, hz in DROPS:
        noise = rng.standard_normal(len(t))
        bubble = np.sin(2 * np.pi * hz * (t + 0.86 * t ** 2)) * fade(t, 0.024)
        splash = band(noise, 0.53 * hz, 1.19 * hz) * fade(t, 0.048) + 0.93 * noise * fade(t, 0.068)
        add(out, s, from_db(level_db - 13.5) * (bubble + 0.27 * splash))
    return out


def taps(rows):
    """A short hollow note, a dry knock, a bright snap and a thud in the counter."""
    out, pushes, t = np.zeros(N), np.zeros(N), T[:SR // 4]
    for s, note_db, hz, snap_db, thud_db, t60 in rows:
        knock_db = (note_db + snap_db) / 2
        noise = rng.standard_normal(len(t))
        breath = rms_one(ring(noise, hz, 1.2 / hz))
        note = (np.sin(2 * np.pi * hz * t) + 0.078 * breath) * fade(t, t60)
        knock = band(noise, 900, 4500) * (fade(t, 0.019) + 0.31 * fade(t, 1.2 * t60))
        snap = band(noise, 4300, 12000) * (fade(t, 0.003) + 0.15 * fade(t, 1.8 * t60))
        add(out, s, from_db(note_db - 6.5) * note + from_db(knock_db) * knock + from_db(snap_db + 9.5) * snap)
        add(pushes, s, from_db([thud_db - 10]))
    return out + counter(pushes)


def ice_blows():
    """Each blow cracks, rings wall and cube modes with fresh strengths, splinters and thuds."""
    hz, mode_db, t60 = np.transpose(GLASS)[:, :, None]
    family = np.digitize(hz, FAMILY_FROM_HZ)
    crack_noise = colour(noise_track(), CRACK)
    touching = flutter(120., depth_db=4.0)   # cubes touch and leave the wall, so its ring is uneven
    sizzle = band(grains(6800.0, spread_db=5.), 5000, 11000)
    out, pushes, t = np.zeros(N), np.zeros(N), T[:SR // 3]
    swell = 1 - np.exp(-t / CONTACT_S)   # a wet, grinding contact builds the sound up
    for s, crack_db, *family_db, ring_share in ICE:
        i = round(s * SR)
        here = slice(i, i + len(t))
        top_db = family_db[-1]
        # where the cube lands matters more for the finer mode shapes
        scatter_db = (1 + family ** 2 / 4) * rng.standard_normal(hz.shape)
        strength = from_db(np.array(family_db)[family] + mode_db + scatter_db)
        rings = strength * np.sin(2 * np.pi * hz * t) * fade(t, t60 * max(ring_share, .1))
        cube_hz = CUBE_LOW_HZ * (CUBE_HIGH_HZ / CUBE_LOW_HZ) ** rng.random((14, 1))
        cube_db = np.interp(np.log(cube_hz), np.log([4000, 9000]), [crack_db - 16, top_db - 13])
        cube = from_db(cube_db) * np.sin(2 * np.pi * cube_hz * t) * fade(t, CUBE_T60_S)
        add(out, s, swell * (touching[here] * rings.sum(axis=0) + cube.sum(axis=0)))
        crack_fall = fade(t, 0.029) + 0.29 * fade(t, 0.051)
        add(out, s, from_db(crack_db - 2.5) * crack_noise[here] * crack_fall)
        splinter_fall = fade(t, 0.019) + 0.073 * fade(t, 0.092)
        add(out, s, from_db(top_db + 8) * sizzle[here] * swell * splinter_fall)
        add(pushes, s, from_db([crack_db - 9.5]))
    return out + counter(pushes)


def ice_rocking():
    """Rocking cubes chatter on: they scrape, keep the wall singing and rumble in counter and air column."""
    scrape = from_db(-22) * rocking(0.37, axis=1)
    singing = from_db(-36) * rocking(.6, axis=2)
    rumble = from_db(-18.5) * rocking(0.67, axis=1)
    hollow = np.where(T < FILLED_AT_S, column(590.0, 1.5, AIR_EMPTY), column(570.0, 5.2, AIR_FILLED))
    chatter = grains(1100.0, spread_db=2.0)
    wall = 0
    for hz, db, t60 in GLASS[:4]:   # the two main pairs
        family = np.digitize(hz, FAMILY_FROM_HZ)
        wall = wall + from_db(db - 0.97 * family) * rms_one(ring(chatter, hz, t60))
    low = rms_one(counter(grains(500., spread_db=2.0))) + from_db(-20) * hollow
    return scrape * colour(chatter, CRACK) + singing * wall + rumble * low


def scene():
    """Direct sound plus reflections that differ between the ports, then the ports' own phase and balance."""
    direct = bumps() + hands() + powder() + water() + taps(TAPS) + ice_blows() + ice_rocking()
    size = next_fast_len(N + SR)
    hz = np.fft.rfftfreq(size, 1 / SR)
    tail = rng.standard_normal((2, SR // 2)) * fade(T[:SR // 2], KITCHEN_T60_S)
    tail /= np.sqrt(np.sum(tail ** 2, axis=1, keepdims=True))
    path = 1 + from_db(at_hz(REFLECTED, hz)) * rfft(tail, size)
    side = np.array([[.5], [-.5]])   # half of each difference to the left, half to the right
    ports = from_db(side * at_hz(PORT_BALANCE, hz)) * np.exp(1j * side * at_hz(PORT_PHASE, hz))
    return irfft(rfft(direct, size) * path * ports, size)[:, :N] + room_tone()


def record(dry):
    """The loudest peaks are rounded and the top is cut."""
    return signal.sosfilt(signal.cheby2(16, 70, CUTOFF_HZ, fs=SR, output="sos"), np.tanh(dry))


dry = scene()
out = record(dry)
wrap_up_sound(out)
```